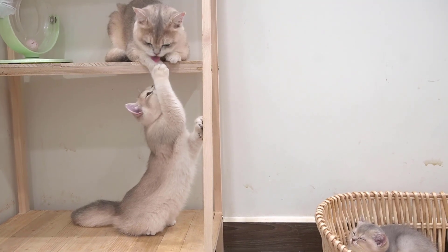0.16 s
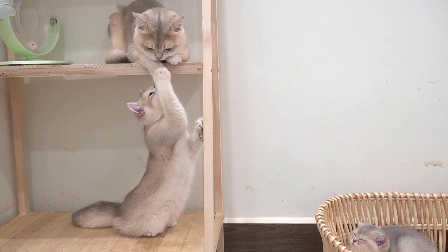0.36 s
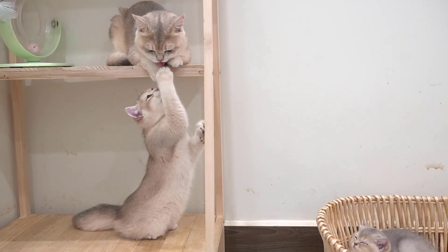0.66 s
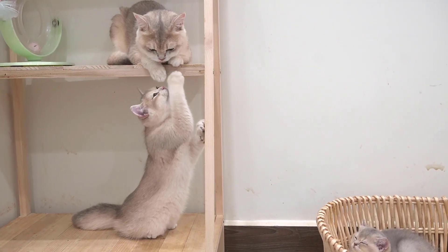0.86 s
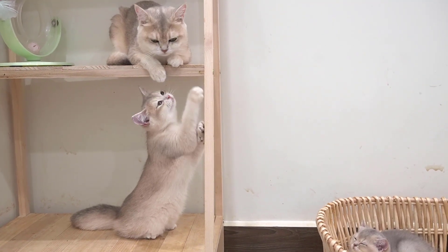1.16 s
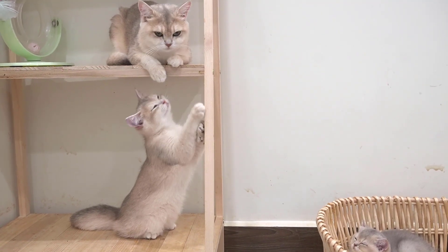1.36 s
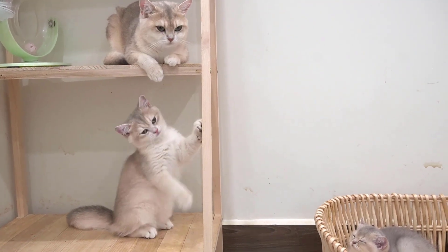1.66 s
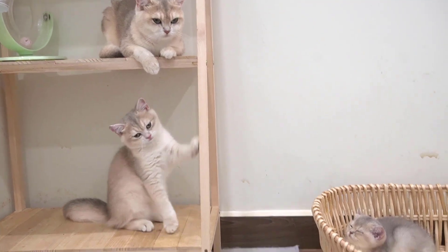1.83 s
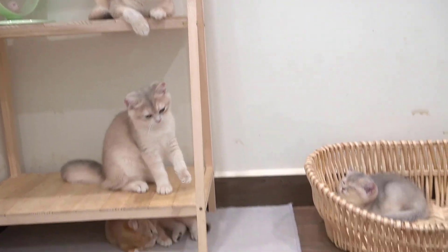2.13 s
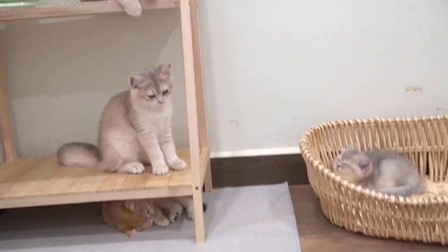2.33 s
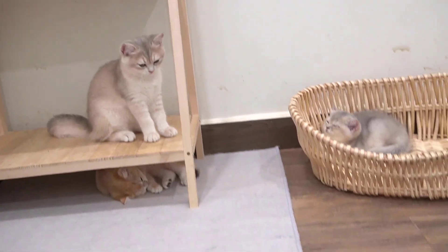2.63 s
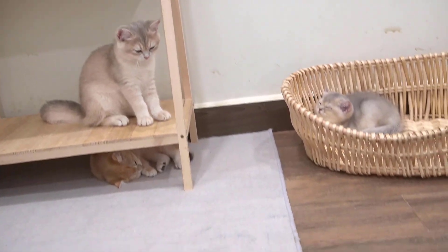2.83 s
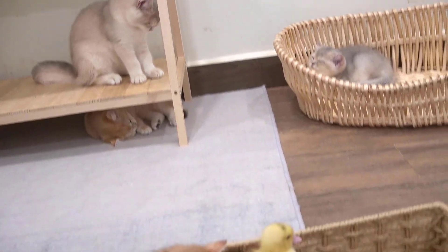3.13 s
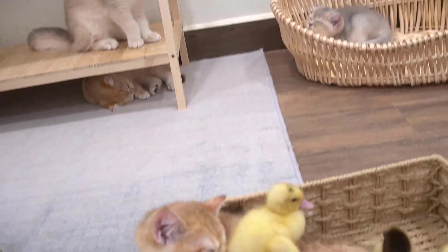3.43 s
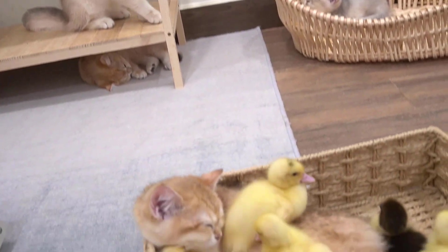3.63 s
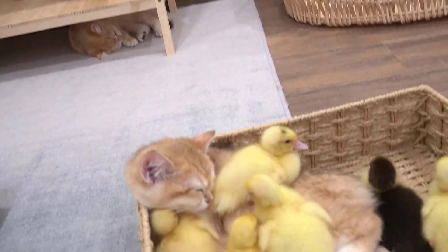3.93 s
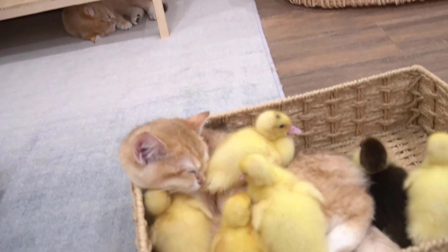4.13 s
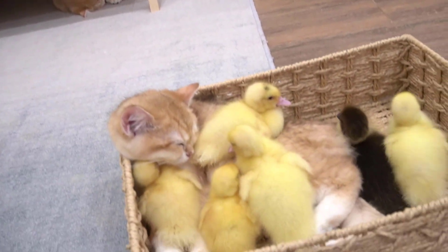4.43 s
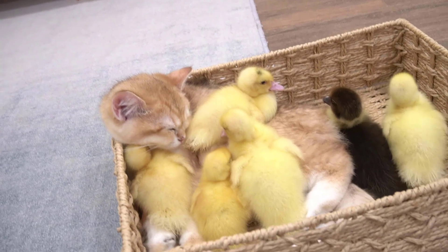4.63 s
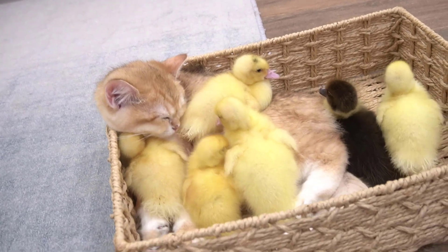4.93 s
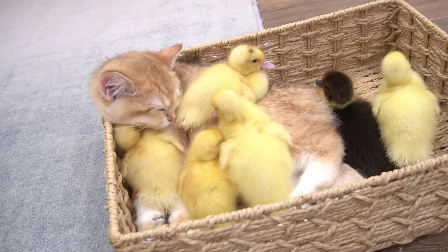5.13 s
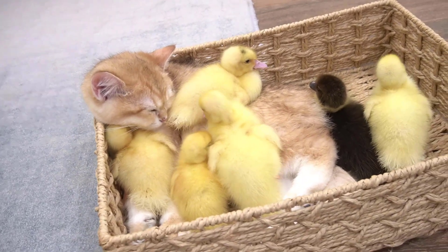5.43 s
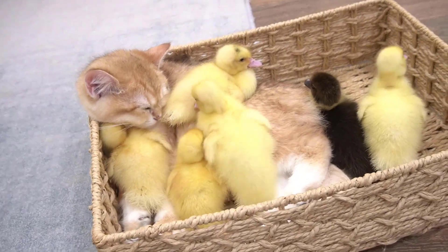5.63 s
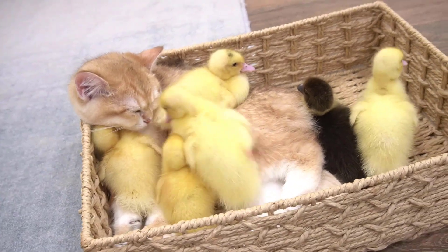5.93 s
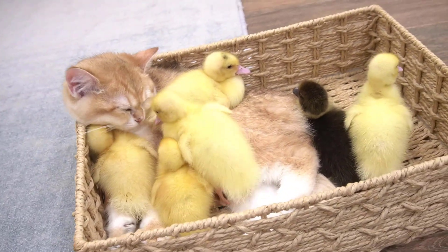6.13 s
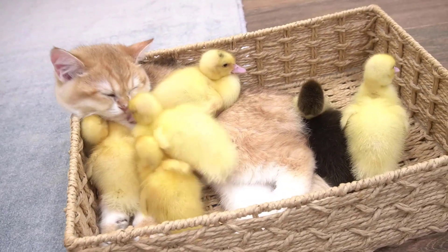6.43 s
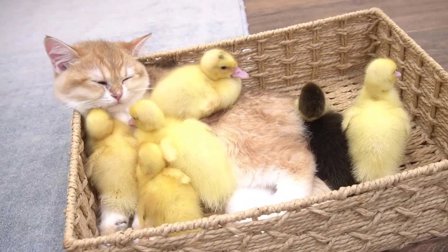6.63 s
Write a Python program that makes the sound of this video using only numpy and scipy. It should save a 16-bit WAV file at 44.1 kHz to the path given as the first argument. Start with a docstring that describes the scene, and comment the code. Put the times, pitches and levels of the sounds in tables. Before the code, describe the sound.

High, short duckling peeps echo lightly in a quiet room, growing sharper and closer over small basket ticks, faint scuffs and soft air noise.

```python
"""Ducklings in a wicker basket

Ducklings peep in a basket on the floor of a small, bare room. Peeps are whistles with gliding pitch and weak
overtones: soft arched, sharper falling and short held. Roughness adds flutter and hiss to held peeps; some
calls break into low rasps. Shaped noise makes wicker ticks, beak clicks, knocks and rustles, and a kitten's
scuffs on a shelf. Room echoes follow the calls and wicker; air noise and a low wavering hum lie beneath."""
import sys
import numpy as np
from scipy import signal
from scipy.fft import rfft, irfft
from scipy.io import wavfile

SR = 44100
rng = np.random.default_rng(int(sys.argv[2]) if len(sys.argv) > 2 else 0)


def int16_out(signal):
    """Quantize to a 16-bit WAV file."""
    q = np.round(np.clip(np.atleast_2d(signal).T, -1, 1) * 32767)
    wavfile.write(sys.argv[1], SR, q.astype(np.int16))


N = 298557
TIME = np.arange(N) / SR

# arched peeps: (start [s], length [s], crest pitch [Hz], end pitch [Hz], level [dB], climb level [dB])
ARCHED_PEEPS = [(-.028, 0.065, 3130, 2450, -27.5, 0), (0.203, 0.059, 2943, 2452, -30.5, -9.5),
                (0.438, 0.0452, 2797, 2466, -34.5, -14), (0.709, .061, 2686, 2306, -43.5, -5.5),
                (0.966, 0.059, 2896, 2270, -38, 3), (1.102, 0.072, 2840, 2380, -35.5, -6.5),
                (1.349, 0.057, 2894, 2370, -35, -2), (1.553, 0.065, 2896, 2417, -34, -5),
                (1.769, 0.074, 3000, 2463, -33.5, -15), (2.016, 0.061, 2823, 2390, -32, -9),
                (2.254, 0.074, 2960, 2380, -32.5, -7.5), (2.509, 0.062, 2974, 2383, -31.5, -7),
                (2.633, .018, 2870, 2610, -37, 3), (2.746, 0.029, 3034, 2513, -35.5, -15),
                (3.02, 0.028, 2883, 2480, -41.5, -11), (3.234, 0.061, 3080, 2450, -37.5, -8),
                (3.383, 0.068, 3110, 2436, -39, -5.5), (3.783, 0.06, 3044, 2467, -38, -7),
                (5.18, 0.023, 2775, 2590, -44.5, -2)]
# overtone level of arched peeps: (time [s], level [dB])
ARCHED_OVERTONE = [(.2, -11), (.7, -6), (1.1, -5.5), (1.7, -1.5), (2.3, -13.5), (2.8, -16), (3.25, -7.5),
                   (5.2, -13)]
# falling peeps: (start [s], length [s], start pitch [Hz], drop time constant [s], level [dB])
FALLING_PEEPS = [(0.15, 0.061, 3150, 0.029, -35.5), (1.032, 0.043, 3700, 0.017, -42),
                 (1.144, 0.036, 3320, 0.0068, -33.5), (1.38, 0.037, 3850, 0.007, -39),
                 (1.517, 0.023, 4120, .005, -36), (3.647, 0.035, 4050, .008, -34),
                 (3.76, 0.052, 4220, 0.0077, -31), (3.909, 0.044, 4250, 0.0071, -31),
                 (4.142, 0.04, 4037, .0055, -34.5), (4.581, 0.033, 3920, 0.0056, -34),
                 (4.697, 0.038, 4270, 0.0096, -30), (4.954, 0.045, 4520, 0.0077, -28),
                 (5.208, 0.047, 4516, 0.0084, -28), (5.438, 0.052, 4610, .0074, -28),
                 (5.656, 0.054, 4500, 0.0063, -26.5), (5.869, 0.057, 4714, 0.0076, -26.5),
                 (6.084, 0.06, 4694, 0.0066, -25.5), (6.304, 0.061, 4730, 0.0053, -25.5),
                 (6.527, .06, 4690, .0068, -27)]
# side the falling peeps come from: (time [s], left minus right [dB])
FALLING_SIDE = [(1.2, 13), (3.6, -10), (6.5, -7)]
# straight path of the falling peeps as the microphone nears the basket: (time [s], gain [dB])
DIRECT_PATH = [(1.5, -8.5), (3.6, -5.5), (5.5, -1.1)]
# held peeps: (start [s], length [s], pitch [Hz], level [dB], roughness [0-1])
HELD_PEEPS = [(2.696, 0.023, 2807, -34.5, 0.19), (2.952, 0.015, 2718, -36.5, 0.22),
              (3.537, 0.042, 2947, -30, 0.04), (3.774, 0.016, 2857, -40, 0.47),
              (3.939, 0.033, 2897, -29.5, 0.12), (4.182, 0.036, 2857, -35, 0.06),
              (4.33, 0.013, 2960, -36, 0.23), (4.341, 0.038, 2807, -29.5, 0.01),
              (4.599, 0.028, 2825, -32.5, 0.04), (4.768, .032, 2840, -31.5, 0)]
# hiss of rough calls: (frequency [Hz], relative level [dB])
HISS_COLOUR = [(700, -32), (1600, -2), (4200, -2), (11000, -26)]
# low rasps from the other side of the syrinx:
# (start [s], length [s], start pitch [Hz], end pitch [Hz], relative level [dB], roughness [about 0-1])
RASPS = [(3.947, 0.028, 2030, 1677, -46.5, 0.54), (4.186, 0.025, 1905, 1687, -45.5, 0.23),
         (4.587, 0.028, 1824, 1590, -58.5, 1.13), (4.758, 0.027, 1997, 1610, -50, 1.03)]
# throat response to overtones: (frequency [Hz], gain [dB])
THROAT = [(4800, -23), (5500, -16), (6200, -9.5), (6800, -10.5), (7600, -14), (9000, -17.5), (12000, -9)]
# crisp ticks from the wicker; those near 4.17 and 4.6 s are beak clicks: (time [s], level [dB])
TICKS = [(0.161, -43.5), (2.187, -46), (3.131, -45), (3.366, -44), (3.532, -53), (4.173, -38), (4.596, -57)]
# tick spectrum: (frequency [Hz], relative level [dB])
TICK_COLOUR = [(600, -27), (2200, 14.5), (4200, 10.5), (6000, -13), (15000, -29)]
# soft knocks against the basket: (time [s], relative level [dB])
KNOCKS = [(2.691, -49.5), (2.946, -52)]
# knock spectrum: (frequency [Hz], relative level [dB])
KNOCK_COLOUR = [(600, -27), (1080, 16), (1400, 4), (2200, 6), (3800, 9), (5000, -13), (12000, -31)]
# wicker rustles: (middle [s], half length [s], level [dB])
RUSTLES = [(1.55, .086, -56.5), (1.92, 0.14, -51), (2.3, 0.12, -57), (2.57, .054, -56), (3.62, 0.1, -57.5),
           (4.507, .1, -59)]
# rustle spectrum: (frequency [Hz], relative level [dB])
RUSTLE_COLOUR = [(300, -18), (1100, 2), (1700, 22.5), (4000, 17.5), (7000, 6.5), (12000, 9), (15500, 0)]
# kitten's paws scuffing a shelf: (middle [s], half length [s], level [dB])
SCUFFS = [(1.55, 0.91, -63.5), (1.97, 0.19, -51)]
# dull scuff spectrum: (frequency [Hz], relative level [dB])
SCUFF_COLOUR = [(40, -43), (90, -6), (280, 3.5), (450, -5.5), (750, 1.5), (1200, -6), (2500, -28)]
# distinct echoes from basket, floor and walls: (delay [s], relative level [dB])
ECHOES = [(.005, -15), (.009, -6), (0.02, -9.5), (0.0255, -16.5), (0.045, -11), (0.072, -15.5),
          (0.091, -23.5)]
# decay of the diffuse tail by 60 dB: (frequency [Hz], time [s])
ROOM_T60 = [(300, 0.085), (1700, 0.96), (2900, 0.81), (6000, 0.82), (14000, 0.097)]
# air noise spectrum: (frequency [Hz], relative density [dB per Hz])
AIR_COLOUR = [(20, -22.5), (50, -5), (80, -2), (150, -2), (320, 3), (480, -9), (780, -7), (1100, -14),
              (1600, -15.5), (4000, -18.5), (8000, -23.5), (13000, -23.5), (15500, -35)]
# hum tones: (frequency [Hz], level before swell [dB], share of the swell [ratio])
HUM = [(124.5, -69.5, -0.083), (148.8, -72.5, 1.3), (206.8, -73.5, 1.64), (315.3, -66.5, -0.28)]
# hum swell as the microphone moves: (time [s], level change [dB])
HUM_SWELL = [(0, -8), (2.5, 5), (5, 6.5), (6.77, 9.5)]
# stereo noise: (frequency [Hz], left-right likeness [0-1])
LIKENESS = [(60, 0.92), (290, 0.89), (640, 0.34), (1400, 0.05), (3000, 0.35), (15000, 0.13)]

CREST_SHARE, CLIMB_HZ, CLIMB_HZ_PER_S = 0.258, 400, 21900  # crest as share of length; climb and its limit
END_HZ, SLIDE_HZ, LAST_SAG_HZ = 2734, 398.5, 226.9  # falling peep: end pitch, even slide, closing drop
HANG_S, TOP_HZ = 0.00918, 4700  # hang at the top of the voice; shorter for lower starts
LOUD_DB, OVERTONE_DB, OVERTONE_SLOPE = -22, -12, 0.77  # overtone at the loud level, dB change per dB
HELD_SAG_HZ, HELD_SAG_S = 308.3, 0.01227
HELD_OVERTONE_DB, ROUGH_DULLING_DB = -7.5, -50  # clean call; change at roughness 1
WHISTLE_HZ = 2943  # spacing of a rasp's faint sum tones
ECHO_DRIFT_S, EAR_LAG_S = 0.0008, 0.00007
AIR_DB = -53.5
EDGE_HZ = 15600


def amp(db):
    """Amplitude ratio from decibels."""
    return 10 ** (np.asarray(db) / 20)


def evened(x):
    """Signal scaled to rms 1."""
    return x / np.sqrt(np.mean(x ** 2) + 1e-20)


def read(points, hz):
    """Table value at a frequency, interpolated on a log axis."""
    f, value = np.transpose(points)
    return np.interp(np.log(hz + 1), np.log(f + 1), value)


def at_time(points, s):
    """Table value at a time, linearly interpolated."""
    return np.interp(s, *np.transpose(points))


def add(mix, s, sound):
    """Add a sound at its start time, cropped to the mix."""
    at = round(s * SR)
    sound = sound[..., max(-at, 0):]
    part = mix[:, max(at, 0):][:, :sound.shape[-1]]
    part += sound[..., :part.shape[1]]


def wander(rate_hz, size=N):
    """Smooth random signal of rms 1, its spectrum fading above the rate."""
    hz = np.fft.rfftfreq(N, 1 / SR)
    spectrum = rfft(rng.standard_normal(N)) * np.exp(-(hz / rate_hz) ** 2)
    return evened(irfft(spectrum, N))[:size]


def noise(colour):
    """Coloured stereo noise of rms 1, most alike between sides in the bass."""
    hz = np.fft.rfftfreq(N, 1 / SR)
    left, other = rfft(rng.standard_normal((2, N)))
    same = np.clip(read(LIKENESS, hz), -1, 1)
    right = same * left + np.sqrt(1 - same ** 2) * other
    return evened(irfft(np.array([left, right]) * amp(read(colour, hz)), N))


def quiver(t, rate_hz):
    """Random unsteadiness over one call: straight lines between random knots."""
    return np.interp(t * rate_hz, np.arange(512), rng.standard_normal(512))


def strokes(rows):
    """Level of smooth strokes that swell and fade."""
    return sum(amp(db) * np.exp(-((TIME - s) / half_s) ** 2) for s, half_s, db in rows)


def syrinx(t, hz, overtone_db, jitter=0.0041, step_db=-14):
    """Unsteady whistle; the throat passes weak, flickering overtones."""
    phase = 2 * np.pi * np.cumsum(hz * (1 + jitter * quiver(t, 581.6))) / SR
    overtones = 0
    for k in range(2, 5):
        gain_db = read(THROAT, k * hz) + step_db * (k - 2)
        overtones = overtones + amp(gain_db) * np.sin(k * phase)
    shimmer = 1 + 0.15 * quiver(t, 300)
    flicker = 0.9 + 0.55 * quiver(t, 600)
    return np.sqrt(2) * (np.sin(phase) + amp(overtone_db) * flicker * overtones) * shimmer


def breath_of_call(t, shape_db, attack_s=0.00037, release_s=0.0024):
    """Call loudness through evenly spaced levels, with rounded ends."""
    ends = np.clip(np.minimum(t / attack_s, (t[-1] - t) / release_s), 0, 1)
    level_db = np.interp(t, np.linspace(0, t[-1], len(shape_db)), shape_db)
    return amp(level_db) * np.sin(np.pi / 2 * ends) ** 2


def arched_peeps(slide=0.787, bend=1.475):
    """Whistles climb quickly to a round crest and slide down; most are loudest just after the crest."""
    out = np.zeros((2, N))
    for s, length_s, top_hz, end_hz, db, climb_db in ARCHED_PEEPS:
        t = np.arange(0, length_s, 1 / SR)
        crest_s = CREST_SHARE * length_s
        before = np.maximum(1 - t / crest_s, 0)
        after = np.maximum((t - crest_s) / (length_s - crest_s), 0)
        # the rate limit makes a brief peep start near its crest
        climb_hz = min(CLIMB_HZ, CLIMB_HZ_PER_S * crest_s) * before ** 2
        fall = 1 - np.exp(-(after / slide) ** bend)
        hz = top_hz - climb_hz - (top_hz - end_hz) * fall / fall[-1]
        swell = breath_of_call(t, [climb_db, climb_db / 2, 0.6, 0.4, -2.5, -7.5], attack_s=0.004)
        whistle = syrinx(t, hz, at_time(ARCHED_OVERTONE, s), jitter=0.012, step_db=-27)
        add(out, s, amp(db) * swell * whistle)
    return out * np.minimum(TIME / 0.004, 1)  # fades in a call already under way


def falling_peeps(dulling_db=-9):
    """Pitch hangs, drops in an easing curve, slides on, and sags as the air runs out."""
    out = np.zeros((2, N))
    for s, length_s, start_hz, drop_s, db in FALLING_PEEPS:
        t = np.arange(0, length_s, 1 / SR)
        u = t / length_s
        hang_s = HANG_S * (start_hz / TOP_HZ) ** 10
        slide_hz = END_HZ + SLIDE_HZ * (1 - u) + LAST_SAG_HZ * (1 - u ** 7)
        drop = np.exp((hang_s - np.hypot(t, hang_s)) / drop_s)
        hz = slide_hz + (start_hz - slide_hz[0]) * drop
        # louder peeps have stronger overtones, which dull through the call
        overtone_db = OVERTONE_DB + OVERTONE_SLOPE * (db - LOUD_DB) + dulling_db * (u - 0.6)
        swell = breath_of_call(t, [-16, -8.5, -3.5, -1.5, 0.3, -0.8, -4.0, -12], attack_s=0.003)
        add(out, s, amp(db) * swell * syrinx(t, hz, overtone_db))
    return out


def held_peeps(flutter=0.29, flutter_hz=1500, clearing_db=-8, hiss_db=-12):
    """Short whistles sag onto their pitch; roughness adds flutter and hiss that lessen through the call."""
    out, hiss = np.zeros((2, N)), np.zeros((2, N))
    for s, length_s, held_hz, db, rough in HELD_PEEPS:
        t = np.arange(0, length_s, 1 / SR)
        hz = held_hz + HELD_SAG_HZ * np.exp(-t / HELD_SAG_S)
        unsteady = rough * amp(clearing_db * (t / length_s - 1.89))
        swell = amp(db) * breath_of_call(t, [4.5, -0.5, 2.8, -4.0], attack_s=0.0045)
        overtone_db = HELD_OVERTONE_DB + ROUGH_DULLING_DB * rough
        whistle = syrinx(t, hz, overtone_db, jitter=0.22 * rough, step_db=-13.0)
        add(out, s, swell * whistle * (1 + flutter * unsteady * quiver(t, flutter_hz)))
        add(hiss, s, swell * unsteady)
    return out + amp(hiss_db) * hiss * noise(HISS_COLOUR)


def rasps(sum_db=-13, jitter=0.147, broken_db=7):
    """A low tone slides down, wobbling and breaking up; mixing with the whistle gives faint sum tones."""
    out = np.zeros((2, N))
    for s, length_s, start_hz, end_hz, db, rough in RASPS:
        t = np.arange(0, length_s, 1 / SR)
        hz = np.linspace(start_hz, end_hz, len(t)) * (1 + jitter * rough * quiver(t, 900))
        tone = 0
        for k in range(3):
            phase = 2 * np.pi * np.cumsum(hz + k * WHISTLE_HZ) / SR
            tone = tone + amp(k * sum_db) * np.sin(phase)
        pieces = evened(tone * amp(broken_db * rough * quiver(t, 500)))
        add(out, s, amp(db) * np.sin(np.pi * t / length_s) * pieces)
    return out


def ticks_and_knocks(snap_s=0.0032):
    """Wicker ticks and beak clicks as decaying noise; softer knocks swell and die in uneven creaks."""
    ticks, knocks = np.zeros((2, N)), np.zeros((2, N))
    t = np.arange(SR // 10) / SR
    for s, db in TICKS:
        add(ticks, s, amp(db) * np.exp(-t / snap_s))
    creak = np.minimum(t / 0.006, 1) * np.exp(-t / 0.017)
    for s, db in KNOCKS:
        slips = evened(amp(7 * quiver(t, 450)))
        add(knocks, s, amp(db) * 2 * creak * slips)
    return ticks * noise(TICK_COLOUR) + knocks * noise(KNOCK_COLOUR)


def rustles_and_scuffs():
    """Wicker rustles as clumped grains of hiss; paw scuffs as lumpy dull noise."""
    grains = evened(amp(3.5 * wander(700) + 2 * wander(45)))
    lumps = evened(amp(2.5 * wander(40)))
    rustles = strokes(RUSTLES) * grains * noise(RUSTLE_COLOUR)
    scuffs = strokes(SCUFFS) * lumps * noise(SCUFF_COLOUR)
    return rustles + scuffs


def room(x, tail_db, early_db, echo_db, early_t60_s=0.23, same=0.46, count=3):
    """Distinct echoes, near reflections and a diffuse tail, changing as the microphone moves."""
    out, same = np.zeros((2, N)), np.clip(same, 0, 1)
    for k in range(count):
        # sparse random reflections, partly shared by both sides
        taps = rng.standard_normal((3, SR)) * (rng.random((3, SR)) < 1 / 40)
        taps = np.sqrt(same) * taps[2] + np.sqrt(1 - same) * taps[:2]
        taps[:, :SR // 400] = 0
        hz, t, z = signal.stft(taps, SR, nperseg=256)
        decay = amp(-60 * t / read(ROOM_T60, hz)[:, None])
        tail = signal.istft(z * decay, SR, nperseg=256)[1][:, :SR]
        early_decay = amp(-60 * np.arange(SR) / SR / early_t60_s)
        early = np.roll(taps[:, ::-1], SR // 400, 1) * early_decay
        response = amp(tail_db) * tail / np.linalg.norm(tail[0])
        response = response + amp(early_db) * early / np.linalg.norm(early[0])
        for delay_s, db in ECHOES:
            drift_s = ECHO_DRIFT_S * rng.uniform(-1, 1)
            arrival_s = delay_s + drift_s + EAR_LAG_S * rng.uniform(-1.2, 1, 2)
            response[np.arange(2), np.round(arrival_s * SR).astype(int)] += amp(db + echo_db)
        # patterns crossfade in turn, one each half second
        turn = (TIME * 2 - k + count / 2) % count - count / 2
        share = np.cos(np.pi / 2 * np.clip(abs(turn), 0, 1))
        out += signal.fftconvolve((x.mean(0) * share)[None], response, axes=1)[:, :N]
    return out


def room_tone(waver_hz=11):
    """Steady air noise and low tones with randomly wavering level and phase."""
    swell_db = at_time(HUM_SWELL, TIME)
    hum = 0
    for hz, db, share in HUM:
        waver = wander(waver_hz) + 1j * wander(waver_hz)
        tone = (waver * np.exp(2j * np.pi * hz * TIME)).real
        hum = hum + amp(db + share * swell_db) * tone
    return amp(AIR_DB) * noise(AIR_COLOUR) + hum


def scene():
    """Falling peeps stand out more from the room as the basket comes near; the rest keeps its balance."""
    soft = arched_peeps() + held_peeps() + rasps() + ticks_and_knocks()
    sharp = falling_peeps()
    soft = soft + room(soft, tail_db=-5.5, early_db=-4.5, echo_db=-0.5)
    side_db = at_time(FALLING_SIDE, TIME) * np.array([[0.5], [-0.5]])
    straight = sharp * amp(at_time(DIRECT_PATH, TIME) + side_db)
    sharp = straight + room(sharp, tail_db=-5.0, early_db=-10.5, echo_db=3.0)
    to_the_right = amp([[-0.6], [0.6]])
    return (soft + sharp) * to_the_right + rustles_and_scuffs() + room_tone()


def record(dry):
    """The recorder's band limit: a linear-phase low-pass."""
    low_pass = signal.firwin(511, EDGE_HZ, window=("kaiser", 9), fs=SR)
    return signal.oaconvolve(dry, low_pass[None], "same")


dry = scene()
out = record(dry)
int16_out(out)
```